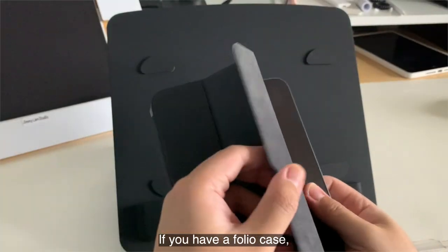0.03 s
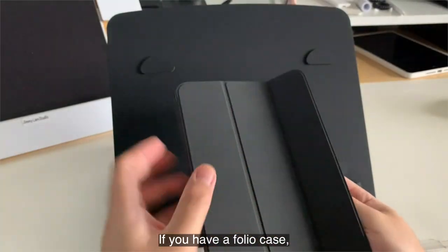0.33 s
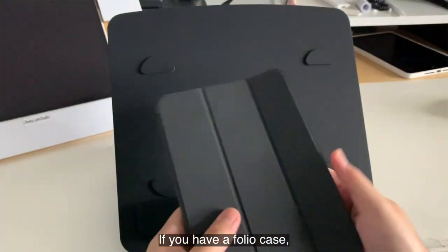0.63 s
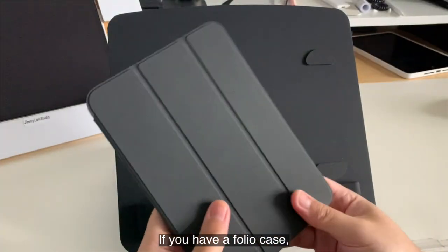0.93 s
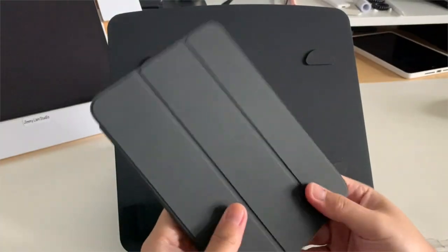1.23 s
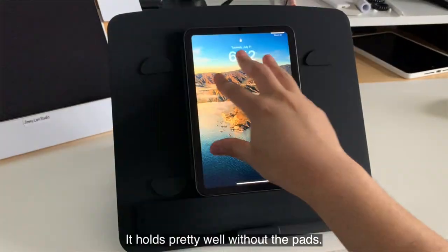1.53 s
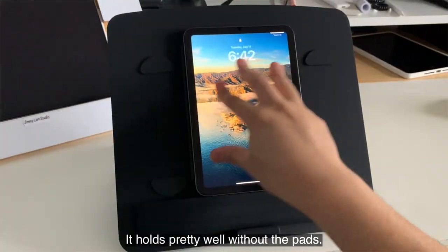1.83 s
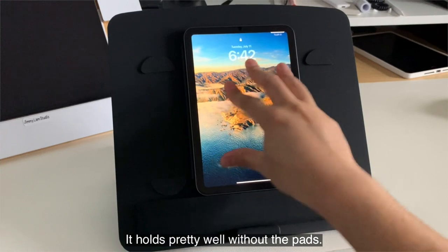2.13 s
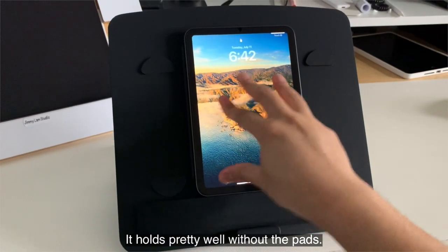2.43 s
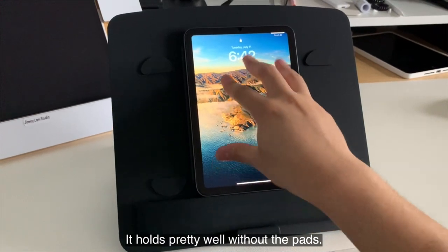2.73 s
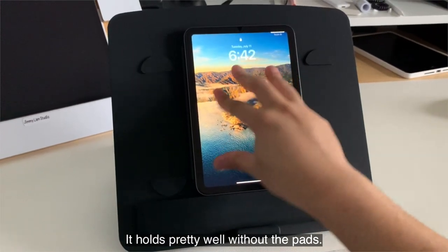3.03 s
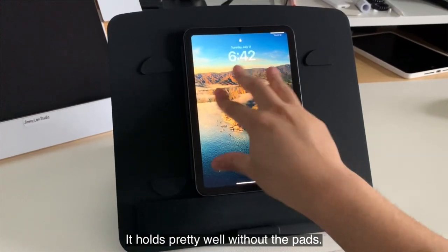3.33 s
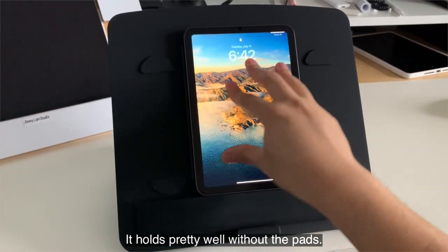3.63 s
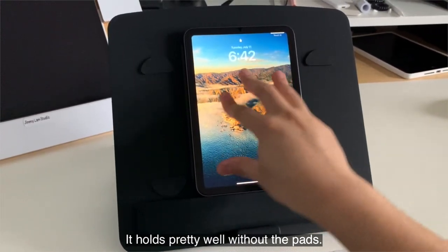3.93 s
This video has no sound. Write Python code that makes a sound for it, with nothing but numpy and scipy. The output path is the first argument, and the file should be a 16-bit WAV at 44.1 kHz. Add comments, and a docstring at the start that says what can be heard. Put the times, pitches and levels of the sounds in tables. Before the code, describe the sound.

A tablet's folio cover claps shut close by at about 0.2 seconds and again, louder and sharper, at 0.7, with light rubbing on the fingers until 1.4. After a faint click at 1.5, a hand presses the tablet on its stand eight times, evenly, from 1.6 to 3.7 seconds. Each push gives a soft thud, with occasional faint ticks and squeaks on glass. Low room rumble and thin hiss continue underneath.

```python
"""A folio case is handled close by in a small room: its cover rubs on the fingers and claps shut twice.
After a faint, thin, bright click, a hand presses a tablet on its stand eight times; each push sets
stand and desk shuddering with a soft thud, and the fingers tick and squeak faintly on the glass.
A low room rumble and a thin, flickering hiss lie under it all."""
import sys
import numpy as np
from scipy import signal
from scipy.fft import rfft, irfft, next_fast_len
from scipy.io import wavfile
from scipy.ndimage import map_coordinates

SR = 44100
rng = np.random.default_rng(int(sys.argv[2]) if len(sys.argv) > 2 else 0)


def master_out(mix):
    """Clip the mix to full scale and print it as 16-bit PCM to the path in sys.argv[1]."""
    frames = np.transpose(np.atleast_2d(mix))
    ceiling = np.clip(frames, -1, 1)
    pcm = np.round(ceiling * 32767).astype(np.int16)
    wavfile.write(sys.argv[1], SR, pcm)


N = 176400
T = np.arange(N) / SR

# cover hits on the tablet: start_s, level_db, left_minus_right_db, cutoff_hz
COVER_HITS = [(0.176, -28, -11, 1200), (.2058, -26, -6, 1600), (.2198, -5, -2.5, 1730),
              (.2305, -41, 16, 1500), (0.6797, 2.5, -3.5, 9000), (0.6835, -13.5, -2, 7000)]
# cased tablet: pitch_hz, level_db, t60_s
CASE_MODES = [(337, -21.5, 0.019), (576, -16.5, 0.015), (850, -39, 0.11), (1135, 0, .0058),
              (1134, -37, .18), (1312, -32.5, 0.098), (1590, -36, 0.1), (1770, -13.5, 0.012),
              (1834, -43.5, 0.19), (2097, -15, 0.022), (2105, -45, 0.13), (2936, -26, 0.019),
              (3860, -32.5, 0.0074)]
# noisy edge of a clack: freq_hz, level_db
CRACK_SPECTRUM = [(100, -18), (300, -4), (1100, 9), (2500, -19), (3300, -6), (4500, -24.5), (8000, -32.5),
                  (16000, -51)]
# clack off desk and walls: delay_s, level_db
REFLECTIONS = [(.011, -16), (.0295, -23)]
# pushes on the tablet: start_s, level_db
TABLET_PUSHES = [(1.5610, -2), (1.8400, -2), (2.1201, -3), (2.4109, -2), (2.7262, -2), (3.0464, -0.5),
                 (3.36, -1.45), (3.6912, 0)]
# stand and desk: pitch_hz, level_db, swell_s, t60_s, left_minus_right_db
STAND_MODES = [(61.46, -28.5, 0.097, 0.043, -0.5), (85, -28.5, .017, 0.014, -1),
               (132.7, -24.5, 0.035, 0.26, 5), (187.3, -22, 0.0041, 0.21, 1),
               (216.95, -21.5, 0.015, 0.1, -1.5), (234.26, -22.5, 0.0347, 0.04, 0.5),
               (312.64, -20, 0.02213, 0.027, -2), (333.35, -25, 0.0063, .14, 2),
               (387.7, -33, 0.0048, 0.22, -3.5), (430.4, -30, 0.0097, 0.07, 6),
               (793.5, -45.5, 0.011, 0.08, -17.5)]
# rattle in a thud: freq_hz, level_db
RATTLE_SPECTRUM = [(100, -22), (500, 9), (900, -2), (1300, -13), (1700, -15.5), (1854, -7.5), (2000, -21),
                   (2400, -17), (5000, -52)]
# room's uptake of a thud: freq_hz, gain_db
THUD_ROOM_GAIN = [(30, -15), (62, 5.5), (130, -5.5), (190, -3.5), (400, 0.5)]
# cover strokes on skin: start_s, length_s, hiss_db, rasp_db
STROKES = [(0.05, 0.024, -56.5, -61), (0.118, 0.067, -56.5, -61), (0.172, 0.043, -62.5, -55),
           (0.445, 0.037, -87, -65), (0.595, 0.098, -69, -64), (0.627, 0.026, -52, -73.5),
           (0.686, .11, -65, -59), (0.778, 0.094, -73.5, -61), (1.026, 0.026, -71, -68.5),
           (1.197, .07, -91, -74), (1.351, 0.083, -93.5, -73.5)]
# hiss of a stroke: freq_hz, level_db
HISS_SPECTRUM = [(500, -32), (3000, -3), (6000, -19), (8500, 5), (13000, 2), (16000, 3)]
# rasp of a stroke: freq_hz, level_db
RASP_SPECTRUM = [(200, -5.5), (700, 3.5), (1400, 2), (3800, -2), (4600, -0.5), (5500, -6.5), (8000, -6.5),
                 (16000, -30)]
# hands on the case: start_s, level_db
HAND_BUMPS = [(0.013, -56), (0.185, -38.5), (0.2262, -48.5)]
# hand bump: freq_hz, level_db
BUMP_SPECTRUM = [(25, -15), (60, 0), (130, 5.5), (230, -3), (400, -15), (750, -8), (1200, -27), (4000, -73)]
# a faint, thin, bright click, then small finger and tablet noises: start_s, level_db, length_s, cutoff_hz
FAINT_CLICKS = [(1.499, -65.5, 0.0028, 15000), (1.7164, -56.5, 0.0072, 7000), (1.9132, -49, 0.0092, 12000),
                (2.649, -63.5, 0.0077, 2300), (2.67, -62, 0.0096, 2600), (3.0312, -50, 0.0095, 12000)]
# faint click: freq_hz, level_db
CLICK_SPECTRUM = [(300, -8.5), (1000, 2), (1300, -7.5), (1650, 3.5), (1870, -1.5), (2050, 4), (2350, -9),
                  (2650, 2.5), (3100, -16), (3650, -3.5), (4000, -11), (4500, -12.5), (7500, -31),
                  (15000, -34)]
# skin squeaking on glass: start_s, level_db
GLASS_SQUEAKS = [(1.539, -73), (3.313, -69)]
# glide of a squeak: elapsed_s, pitch_hz
SQUEAK_GLIDE = [(0, 4400), (.017, 4650), (.038, 4200), (.052, 3680), (.11, 3650)]
# room rumble: freq_hz, level_db
RUMBLE_SPECTRUM = [(15, -59.5), (25, -20.5), (45, -9), (66, -2), (100, -6), (150, -5.5), (300, -9),
                   (500, -12.5), (750, -21), (1200, -27), (2400, -32.5), (3200, -43), (5000, -48),
                   (16000, -57.5)]
# background hiss: freq_hz, level_db
AIR_SPECTRUM = [(1000, -22.5), (4000, -13), (6500, -5.5), (8500, 5), (15500, 1)]
# left-right likeness in the room: freq_hz, correlation
COHERENCE = [(60, 0.96), (250, 0.84), (700, 0.051), (2000, 0.13), (5000, 0.14), (8000, 0.79), (11000, 1)]
# room decay: freq_hz, t60_s
ROOM_DECAY = [(60, 0.71), (200, 0.49), (500, 0.32), (1500, 0.27), (4000, 0.35), (12000, 0.14)]


def clacks():
    """The cover slaps the tablet: a short crack, damped modes and a faint longer ring."""
    contact_s, low_cut_hz = 0.0004, 260  # padded cover; the small case radiates no bass
    out, t = np.zeros((2, N)), stereo_time(SR // 4, left_lag_s=0.00018)
    ring = sum(amp(db) * fade(t, t60_s) * np.sin(2 * np.pi * hz * t) for hz, db, t60_s in CASE_MODES)
    ring *= 1 - np.exp(-(t / contact_s) ** 2)
    crunch = amp(-19) * noise(CRACK_SPECTRUM)
    for start_s, db, side_db, cutoff_hz in COVER_HITS:
        crack = crunch[:, round(start_s * SR):][:, :t.shape[1]] * burst(t, contact_s, 0, t60_s=0.033)
        slap = amp(db) * pan(side_db) * butter(ring + crack, cutoff_hz)
        add(out, start_s, slap)
        for delay_s, echo_db in REFLECTIONS:
            add(out, start_s + delay_s, amp(echo_db) * slap)
    out = butter(out, low_cut_hz, "highpass")
    return out + room(out, wet_db=-14.5)


def thuds():
    """Each push swells the modes of stand and desk, with a faint rattle; the hand then damps them."""
    out, t = np.zeros((2, N)), stereo_time(SR // 2, left_lag_s=0.00028)
    hand_damping = fade(t - 0.073, t60_s=0.02)
    modes = []
    for hz, db, swell_s, t60_s, side_db in STAND_MODES:
        envelope = np.minimum(t / swell_s, 1) ** 1.82 * fade(t - swell_s, t60_s) * hand_damping
        modes.append(pan(side_db) * amp(db) * envelope * np.sin(2 * np.pi * hz * t))
    for start_s, db in TABLET_PUSHES:
        scatter_db = rng.standard_normal(len(modes))
        thud = np.tensordot(amp(db + scatter_db), modes, 1)
        reverb = room(thud, wet_db=-14.5, gap_s=0.017)
        add(out, start_s, thud + filtered(reverb, lambda hz: amp(along(THUD_ROOM_GAIN, hz))))
    out = butter(out, cutoff_hz=547, order=4)  # a soft hand excites no treble
    rattle_gain = sum(amp(db - 50.5) * burst(T - s, 0.014, 0.044, t60_s=0.45) for s, db in TABLET_PUSHES)
    return out + rattle_gain * noise(RATTLE_SPECTRUM)


def handling():
    """The cover slides over skin in short rough strokes; the hands bump the case."""
    right, rough_db = pan(-0.5), 0.5
    hiss, rasp = noise(HISS_SPECTRUM), right * noise(RASP_SPECTRUM)
    rasp *= unit(amp(rough_db * wobble(600)))  # skin catches and lets go
    rubs = sum(burst(T - s, 0.037, length_s, t60_s=0.046) * (amp(hiss_db) * hiss + amp(rasp_db) * rasp)
               for s, length_s, hiss_db, rasp_db in STROKES)
    bump_gain = sum(amp(db) * burst(T - s, 0.0012, 0.0044, t60_s=0.046) for s, db in HAND_BUMPS)
    bumps = right * bump_gain * noise(BUMP_SPECTRUM)
    out = rubs * amp(rough_db * (wobble(300) + wobble(60))) + bumps
    return out + room(out, wet_db=-12.5)


def clicks_and_squeaks():
    """Faint clicks, bright or dull, and rough, falling squeaks of skin slipping on the glass."""
    jitter_hz, jitter_db = 330, 3
    click_noise = noise(CLICK_SPECTRUM)
    out = sum(butter(click_noise * amp(db) * burst(T - s, 0.0012, length_s, t60_s=0.037), cutoff_hz)
              for s, db, length_s, cutoff_hz in FAINT_CLICKS)
    for start_s, db in GLASS_SQUEAKS:
        pitch_hz = np.interp(T - start_s, *np.transpose(SQUEAK_GLIDE)) + jitter_hz * wobble(1500)
        grip = unit(amp(jitter_db * wobble(500)))
        envelope = burst(T - start_s, 0.018, 0.086, t60_s=0.21)
        out += amp(db) * grip * envelope * np.sin(2 * np.pi * np.cumsum(pitch_hz) / SR)
    return out + room(out, wet_db=-8)


def room(x, wet_db, gap_s=0.0027):
    """Reverberation: starts after a gap, each frequency dying at its own rate."""
    hz, t, spectra = signal.stft(widen(rng.standard_normal((2, SR // 2))), SR, nperseg=256)
    tail = signal.istft(spectra * fade(t, along(ROOM_DECAY, hz)[:, None]), SR, nperseg=256)[1]
    tail *= np.clip(T[:tail.shape[1]] / gap_s - 1, 0, 1)
    tail /= np.linalg.norm(tail, axis=1, keepdims=True)
    return amp(wet_db) * signal.fftconvolve(x, tail, axes=1)[:, :x.shape[1]]


def background():
    """Steady room rumble and a thin hiss that flickers."""
    flicker_db, flicker_hz = 3.5, 13
    rumble = amp(-56) * noise(RUMBLE_SPECTRUM)
    hiss_db = -80.5 + flicker_db * np.sin(2 * np.pi * flicker_hz * T + wobble(1.8))
    return rumble + amp(hiss_db) * noise(AIR_SPECTRUM)


def amp(db):
    """Decibels to gain."""
    return 10 ** (np.asarray(db) / 20)


def unit(x):
    """Scale to rms 1."""
    return x / np.sqrt(np.mean(x ** 2) + 1e-20)


def along(points, hz):
    """Interpolate (freq_hz, value) points on a log axis."""
    freq_hz, values = np.transpose(points)
    return np.interp(np.log(hz + 1), np.log(freq_hz + 1), values)


def fade(t, t60_s):
    """Full until t = 0, then exponential decay."""
    return np.exp(-np.log(1000) * np.maximum(t, 0) / t60_s)


def burst(t, rise_s, length_s, t60_s):
    """Linear rise; decay from length_s on."""
    return np.clip(t / rise_s, 0, 1) * fade(t - length_s, t60_s)


def pan(db):
    """Stereo gains for a left-minus-right level."""
    return amp(np.array([[db], [-db]]) / 2)


def stereo_time(samples, left_lag_s):
    """Seconds since arrival, left and right."""
    return np.maximum(T[:samples] - np.array([[left_lag_s], [0]]), 0)


def wobble(rate_hz):
    """Smooth random curve, knots at rate_hz."""
    return map_coordinates(rng.standard_normal(int(N * rate_hz / SR) + 4), [T * rate_hz])


def butter(x, cutoff_hz, kind="lowpass", order=2):
    """Maximally flat filter."""
    return signal.sosfilt(signal.butter(order, cutoff_hz, kind, fs=SR, output="sos"), x)


def filtered(x, response):
    """Apply a frequency response."""
    size = next_fast_len(x.shape[-1] + 8192)
    return irfft(rfft(x, size) * response(np.fft.rfftfreq(size, 1 / SR)), size)[..., :x.shape[-1]]


def widen(pair):
    """Two independent noises to stereo with the room's coherence."""
    def weights(hz):
        angle = np.arccos(np.clip(along(COHERENCE, hz), -1, 1)) / 2
        return np.array([np.cos(angle), np.sin(angle)])
    mid, side = filtered(pair, weights)
    return np.array([mid + side, mid - side])


def noise(spectrum):
    """Coloured stereo noise, rms 1."""
    return unit(filtered(widen(rng.standard_normal((2, N))), lambda hz: amp(along(spectrum, hz))))


def add(track, start_s, sound):
    """Mix a sound in at start_s."""
    part = track[:, round(start_s * SR):][:, :sound.shape[-1]]
    part += sound[..., :part.shape[-1]]


def scene():
    """Case, stand, clicks and squeaks over the background."""
    return clacks() + handling() + thuds() + clicks_and_squeaks() + background()


def record(dry):
    """Hard band limit."""
    return filtered(dry, lambda hz: hz < 15800)


dry = scene()
out = record(dry)
master_out(out)
```